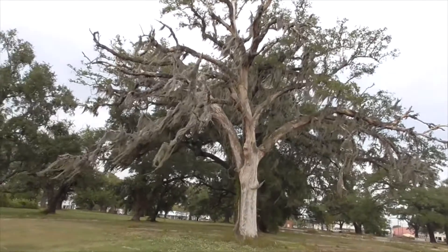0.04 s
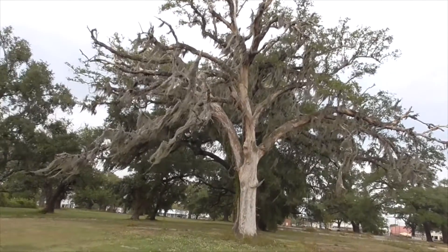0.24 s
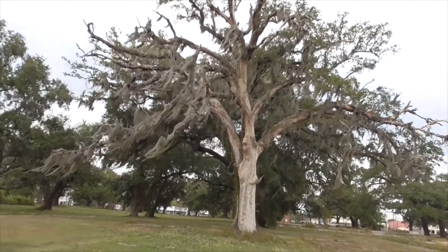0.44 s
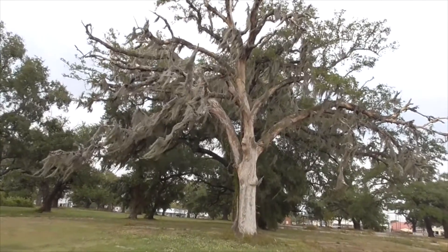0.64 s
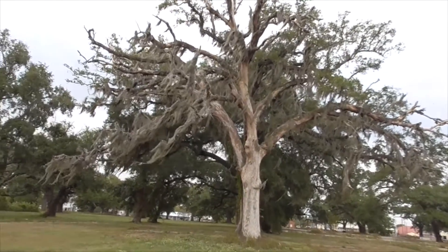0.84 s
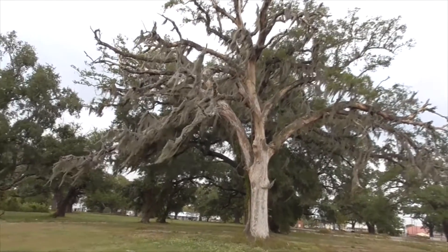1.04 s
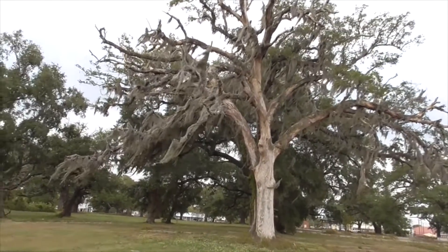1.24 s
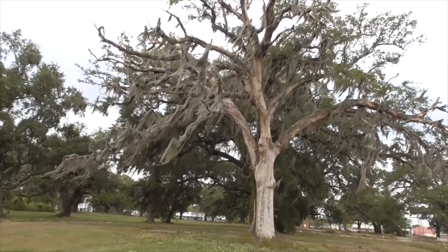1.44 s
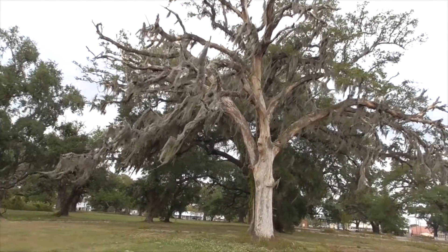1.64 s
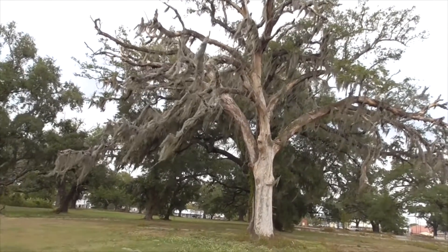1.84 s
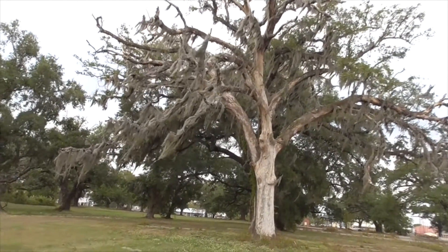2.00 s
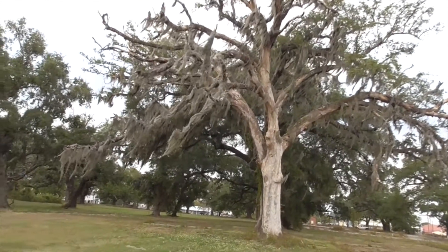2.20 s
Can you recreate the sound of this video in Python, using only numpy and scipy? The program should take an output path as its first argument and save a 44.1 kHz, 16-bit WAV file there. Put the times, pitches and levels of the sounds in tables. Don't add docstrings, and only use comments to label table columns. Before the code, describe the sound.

Wind buffeting rumbles low on a handheld camera's microphone, soft at first, then in strong uneven throbs; very faint leaf hiss, shoes brushing grass and small twig snaps lie beneath, on an open lawn with trees.

```python
import sys
import numpy as np
from scipy import signal
from scipy.fft import rfft, irfft, next_fast_len
from scipy.io import wavfile
from scipy.ndimage import uniform_filter1d

SR = 44100
rng = np.random.default_rng(int(sys.argv[2]) if len(sys.argv) > 2 else 0)


def volts_from_db(level):
    exponent = np.asarray(level, float) / 20
    return 10 ** exponent


def dump(signal):
    limited = np.clip(np.atleast_2d(signal).T, -1, 1)
    pcm = np.round(limited * 32767).astype(np.int16)
    wavfile.write(sys.argv[1], SR, pcm)


N = 99886


def rms_one(x):
    return x / np.sqrt(np.mean(x ** 2) + 1e-20)


def in_time(rows):
    s, *columns = np.transpose(rows)
    return [np.interp(np.arange(N) / SR, s, c) for c in columns]


def at_hz(points, hz):
    table_hz, values = np.transpose(points)
    return np.interp(np.log(hz), np.log(table_hz), values)


def drift(rate):
    r = np.exp(-80 * np.pi * rate / SR)
    slow = signal.lfilter([1], [1, -2 * r, r * r], rng.standard_normal(N // 40 + 2002))[2000:]
    return np.interp(np.arange(N) / 40, np.arange(len(slow)), rms_one(slow))


def coloured(x, spectrum, patchy_db, rate):
    size = next_fast_len(N)
    hz = np.maximum(np.arange(size // 2 + 1) * SR / size, 1)
    low, high = spectrum[0][0], spectrum[-1][0]
    skirts = 1 / np.sqrt((1 + (low / hz) ** 8) * (1 + (hz / high) ** 8))
    shaped = rfft(x, size) * volts_from_db(at_hz(spectrum, hz)) * skirts
    out = 0
    for centre in 2.0 ** np.arange(np.floor(np.log2(low)) - 1, np.log2(high) + 2):
        octave = np.cos(np.pi / 2 * np.clip(np.log2(hz / centre), -1, 1)) ** 2
        out = out + irfft(shaped * octave, size)[..., :N] * volts_from_db(patchy_db * drift(rate))
    return rms_one(out)


# (frequency [Hz], likeness [0 to 1])
PORT_LIKENESS = [(300, 1), (2000, 0.88), (4500, 0.32), (9000, 0.077), (15000, 0.21)]


def air_pair():
    mid, side = rfft(rng.standard_normal((2, N)))
    alike = np.clip(at_hz(PORT_LIKENESS, np.maximum(np.arange(len(mid)) * SR / N, 1)), 0, 1)
    return irfft(np.sqrt(1 + alike) * mid + np.sqrt(1 - alike) * side * [[1], [-1]], N)


# (frequency [Hz], level [dB per Hz])
RUMBLE_SPECTRUM = [(41, -57), (70, -11.5), (107, -10.5), (150, -9), (200, -2), (300, -9.5), (700, -39.5),
                   (1000, -38)]
TILT_HZ, LOPSIDED = 157, 0.1


def buffeting(tilt_db):
    rumble = coloured(rng.standard_normal(N), RUMBLE_SPECTRUM, patchy_db=-0.9, rate=14.0)
    high = signal.sosfiltfilt(signal.butter(2, TILT_HZ, "high", fs=SR, output="sos"), rumble)
    rumble = volts_from_db(tilt_db) * high + volts_from_db(-tilt_db) * (rumble - high)
    power = uniform_filter1d(uniform_filter1d(rumble ** 2, size=700), size=700) + 0.063
    rumble = rms_one(rumble / np.sqrt(power))
    return rms_one(rumble + LOPSIDED * (rumble ** 2 - 1))


# (time [s], level [dB], left port against the level
# [dB], tilt to higher pitch [dB])
GUSTS = [(0, -38, 7, -8), (.15, -31.5, -4.5, -0.5), (.28, -42.5, 5.5, -5.5), (.4, -24.5, -0.5, -6),
         (.45, -18.5, -2, -4), (.54, -19, -4.5, 2.5), (.7, -28.5, -3, 0.5), (.82, -19.5, -7, 3),
         (1.02, -26, -5.5, -3.5), (1.12, -35, -3, -5), (1.3, -22, -6, -2.5), (1.45, -23, 0, -6),
         (1.56, -19.5, -7, 4), (1.66, -24.5, 0.5, 5), (1.8, -22, -10.5, 2.5), (1.92, -16, 2, 3.5),
         (1.99, -22.5, -2, 4), (2.26, -21.5, -4, -1.5)]
# (time [s], depth [dB])
WIND_LULLS = [(0.089, -3), (0.11, -9), (0.181, -2), (0.297, -1), (0.356, -2), (0.391, -7.5), (0.551, -7.5),
              (0.583, -9.5), (0.615, -5.5), (0.709, -2), (0.759, -0.5), (0.865, -5.5), (0.919, -5),
              (1.128, -2), (1.168, -2), (1.236, -9), (1.264, -10.5), (1.299, -7), (1.348, -10.5),
              (1.433, -3.5), (1.487, -3), (1.519, -3), (1.624, -8), (1.674, -6), (1.766, -2), (1.842, -0.5),
              (2.085, -1.5), (2.16, -3.5), (2.188, -8), (2.226, -2.5)]
# (frequency [Hz], level [dB per Hz])
SWELL_SPECTRUM = [(20, -15), (45, -19.5), (80, -10), (120, 1)]
# (frequency [Hz], level [dB per Hz])
RUSH_SPECTRUM = [(350, 3), (550, -5), (800, -13), (1200, -15), (1500, -22), (1750, -38), (2300, -35.5),
                 (2700, -62)]
LULL_S, BED_DB, PUSHED_ASIDE = 0.0089, -1, 0.31
SWELL_DB, SWELL_FOLLOWS = -9.5, 0.58
RUSH_DB, RUSH_FOLLOWS, EDDY_RUSH = -13, 0.83, 0.35


def wind():
    level_db, left_db, tilt_db = in_time(GUSTS)
    t = np.arange(N) / SR
    lull_db = sum(db * np.exp(-.5 * ((t - s) / LULL_S) ** 2) for s, db in WIND_LULLS)
    throb, size, present = eddies()
    aside = 1 - PUSHED_ASIDE * present
    ports = []
    for port, port_db in enumerate((level_db + left_db, level_db + 6.5)):
        bed_db = port_db + BED_DB + lull_db + 1.1 * drift(33)
        effort_db = 20 * np.log10(volts_from_db(bed_db) + EDDY_RUSH * size[port])
        rumble = buffeting(tilt_db)
        swell = coloured(rng.standard_normal(N), SWELL_SPECTRUM, patchy_db=-0.5, rate=12.4)
        rush = coloured(rng.standard_normal(N), RUSH_SPECTRUM, patchy_db=1.2, rate=4.4)
        flutter_db = 1.8 * drift(45)
        rush_db = RUSH_DB - 24.0 + RUSH_FOLLOWS * (effort_db + 24.0) + 0.57 * tilt_db + flutter_db
        swell_db = SWELL_DB - 15.5 + SWELL_FOLLOWS * (effort_db + 16.5) - 0.19 * tilt_db
        bed = volts_from_db(bed_db) * aside * rumble
        ports.append(bed + throb[port] + volts_from_db(swell_db) * swell + volts_from_db(rush_db) * rush)
    return np.array(ports)


# (time [s], level [dB])
TREES_LEVEL = [(0, -59.5), (.5, -61), (.6, -65), (.75, -61.5), (1.1, -61), (1.5, -60.5), (1.58, -66),
               (1.72, -65), (1.85, -63), (2.1, -64), (2.26, -62)]
# (frequency [Hz], level [dB per Hz])
LEAF_SPECTRUM = [(1470, 4), (2500, -44), (2890, -3), (4970, -2.5), (5320, -5), (5740, -6), (8280, -2.5),
                 (11200, -7), (15500, -13.5)]
# (frequency [Hz], level [dB per Hz])
ROAR_SPECTRUM = [(180, -59), (300, -37.5), (428, -9), (476, -12), (694, -10), (841, -12), (3000, -35.5),
                 (3900, -53), (6600, -120)]
LEAF_HISS_DB, FAR_ROAR_DB = 5, 17.5


def trees():
    level_db, = in_time(TREES_LEVEL)
    hiss = volts_from_db(LEAF_HISS_DB) * coloured(air_pair(), LEAF_SPECTRUM, patchy_db=.35, rate=12)
    roar = volts_from_db(FAR_ROAR_DB) * coloured(air_pair(), ROAR_SPECTRUM, patchy_db=.7, rate=12)
    return volts_from_db(level_db) * (hiss + roar)


# (time [s], peak [dB], lean [-1 right to 1 left], pitch [Hz])
STRONG_EDDIES = [(0.145, -21, 0.3, 145), (0.211, -21, -0.49, 98), (0.382, -24, -0.2, 124),
                 (0.432, -16.5, 0.97, 118), (0.461, -6.5, -0.066, 178), (0.498, -10, -0.88, 220),
                 (0.51, -13.5, -0.45, 142), (0.527, -12, -0.89, 260), (0.56, -16, -1.1, 185),
                 (0.597, -16, 0.14, 167), (0.636, -17, -0.91, 143), (0.752, -21, -1.1, 194),
                 (0.808, -13, -0.7, 209), (0.828, -12.5, -0.26, 127), (0.841, -27, -0.01, 135),
                 (0.875, -13.5, -1.3, 137), (0.909, -16.5, -0.76, 183), (0.958, -16, -0.77, 155),
                 (0.987, -14.5, -1.15, 113), (1.009, -15.5, -0.5, 178), (1.152, -26, -0.09, 115),
                 (1.204, -21, -0.4, 178), (1.216, -15.5, -0.59, 134), (1.248, -20, -1.2, 145),
                 (1.277, -21, -1.3, 140), (1.308, -19, -0.33, 110), (1.332, -20, -0.9, 134),
                 (1.4, -10.5, -0.83, 124.5), (1.452, -20, 0.24, 129), (1.503, -17, 0.2, 188),
                 (1.544, -10.5, -0.57, 216), (1.57, -21, -0.09, 188), (1.604, -15, -1.1, 147),
                 (1.646, -23, -1.1, 155), (1.683, -18, -1.1, 204), (1.704, -15.5, -1.25, 253),
                 (1.721, -15.5, 1, 216.4), (1.754, -11.5, 1, 180), (1.78, -15.5, -0.57, 195),
                 (1.82, -12, -1.1, 194), (1.851, -17, -0.79, 195), (1.91, -23, 1, 178),
                 (1.937, -6, -0.17, 139), (2.002, -19, -0.31, 195), (2.014, -21, -0.74, 167),
                 (2.043, -17, 0.72, 156), (2.121, -20.5, -0.54, 169), (2.135, -21, -0.54, 223),
                 (2.201, -12, -0.49, 122), (2.254, -13, -0.47, 114)]
EDDY_CYCLES, EDDY_SCATTER, EDDY_PEAKY = .8, 0.79, 0.28
LOW_EDDY_DB_PER_OCTAVE = 4


def eddies():
    t = np.arange(N) / SR
    throb, size, present = np.zeros((2, N)), np.zeros((2, N)), np.zeros(N)
    phases = rng.normal(0, EDDY_SCATTER, len(STRONG_EDDIES))
    for (s, db, lean, hz), phase in zip(STRONG_EDDIES, phases):
        near = slice(max(int((s - .05) * SR), 0), int((s + .05) * SR))
        bell = np.exp(-.5 * ((t[near] - s) * hz / EDDY_CYCLES) ** 2)
        peak_db = db + LOW_EDDY_DB_PER_OCTAVE * min(np.log2(hz / 190), 0)
        balance = 1 + np.clip(lean, -1, 1) * np.array([[1], [-1]])
        height = volts_from_db(peak_db) * bell * balance
        turn = 2 * np.pi * hz * (t[near] - s) + phase
        throb[:, near] += height * (np.cos(turn) + EDDY_PEAKY * np.cos(2 * turn))
        size[:, near] += height
        present[near] = np.maximum(present[near], bell)
    return throb, size, present


# (time [s], level [dB], rise [s], fall [s])
GRASS_SWEEPS = [
    (.15, -56, 0.048, 0.037),
    (.752, -54.5, 0.034, 0.056),
    (1.275, -55, 0.046, 0.021),
    (1.37, -51.5, 0.05, 0.028),
    (1.42, -55, 0.017, .055),
    (1.88, -57.5, 0.04, 0.034),
    (1.99, -59, 0.051, 0.066),
]
# (frequency [Hz], level [dB per Hz])
GRASS_SPECTRUM = [(1470, -26), (2500, -9), (2660, -20), (3310, -0.5), (5780, -1.5), (8800, 4.5),
                  (13100, -1), (15500, -24)]
BLADES_PER_S, SMOOTH_SHARE = 1300, 0.78


def steps():
    t = np.arange(N) / SR
    sweep = 0
    for s, db, rise, fall in GRASS_SWEEPS:
        sweep = sweep + volts_from_db(db) * np.exp(-.5 * ((t - s) / np.where(t < s, rise, fall)) ** 2)
    struck = rng.random(N) < BLADES_PER_S / SR
    strength = volts_from_db(1.2 * np.minimum(rng.exponential(1, N), 5))
    blades = struck * strength * rng.choice([-1, 1], N)
    source = SMOOTH_SHARE * rms_one(air_pair()) + np.sqrt(1 - SMOOTH_SHARE ** 2) * rms_one(blades)
    return sweep * volts_from_db(0.89 * drift(90)) * coloured(source, GRASS_SPECTRUM, patchy_db=2.5, rate=140)


# (time [s], peak [dB], pitch [Hz], decay by 60 dB [s])
STEM_SNAPS = [(.744, -44, 5500, .025), (0.758, -36.5, 8400, .02), (1.228, -48, 7700, .012),
              (1.273, -46, 7000, .01), (1.2758, -31, 9300, 0.014), (1.285, -48, 9000, .01),
              (1.308, -49, 9000, .01), (1.3395, -49, 9000, .008), (1.37, -55, 8500, .015),
              (1.395, -49, 8500, .015), (1.433, -50, 8500, .01), (1.36, -45, 9000, .02),
              (1.409, -39, 8500, 0.016), (1.5394, -29.5, 1440, 0.0015), (1.8975, -40.5, 4800, 0.0045),
              (1.99, -53, 9000, .01), (2.074, -46, 6000, .005), (2.205, -30, 685, 0.037)]
SNAP_RISE_S, STEM_RING = 0.00019, 1.9


def snaps():
    out, t = np.zeros((2, N)), np.arange(1024) / SR
    noises = rng.standard_normal((len(STEM_SNAPS), 3, 1024))
    for (s, db, hz, t60), noise in zip(STEM_SNAPS, noises):
        nearly_alike = noise[0] + 0.14 * noise[1:]
        burst = nearly_alike * volts_from_db(-60 * t / t60) * (1 - np.exp(-t / SNAP_RISE_S))
        burst[:, int(SR / hz)] += (4500 / hz) ** 2
        edges = [max(hz / 3, hz - 4500), min(hz * 2.3, hz + 5200)]
        burst = signal.sosfilt(signal.butter(5, edges, "band", fs=SR, output="sos"), burst)
        burst = burst + STEM_RING * signal.lfilter(*signal.iirpeak(hz, 4.5, fs=SR), burst)
        i = int(s * SR)
        out[:, i:i + 1024] += volts_from_db(db) * burst / np.abs(burst).max()
    return out


def scene():
    return wind() + trees() + steps() + snaps()


def roll_off(x):
    return signal.sosfilt(signal.butter(12, 15620, fs=SR, output="sos"), x)


# (time [s], side gain in the bass [x], side gain in the treble [x])
STEREO_WIDTH = [(0, 1.74, 0.74), (.3, 1.8, 0.89), (.45, 0.84, 1.1), (.7, 0.86, 0.89), (1.2, 0.73, 1.07),
                (1.5, 0.53, 0.7), (1.58, 0.23, 0.34), (1.75, 0.14, 0.052), (1.9, 0, 0.029),
                (2.18, 0.0031, 0), (2.26, 0.028, 0)]
TOP_HZ, WIDTH_SPLIT_HZ, CEILING = 15600, 3000, .85


def record(dry):
    x = signal.sosfilt(signal.butter(3, 40, "high", fs=SR, output="sos"), dry)
    x = signal.sosfilt(signal.cheby2(24, 60, TOP_HZ + 300, fs=SR, output="sos"), x)
    bass_width, treble_width = in_time(STEREO_WIDTH)
    mid, side = (x[0] + x[1]) / 2, (x[0] - x[1]) / 2
    treble = signal.sosfiltfilt(signal.butter(1, WIDTH_SPLIT_HZ, "high", fs=SR, output="sos"), side)
    side = bass_width * (side - treble) + treble_width * treble
    x = mid + side * [[1], [-1]]
    return roll_off(CEILING * np.tanh(x / CEILING))


dry = scene()
out = record(dry)
dump(out)
```